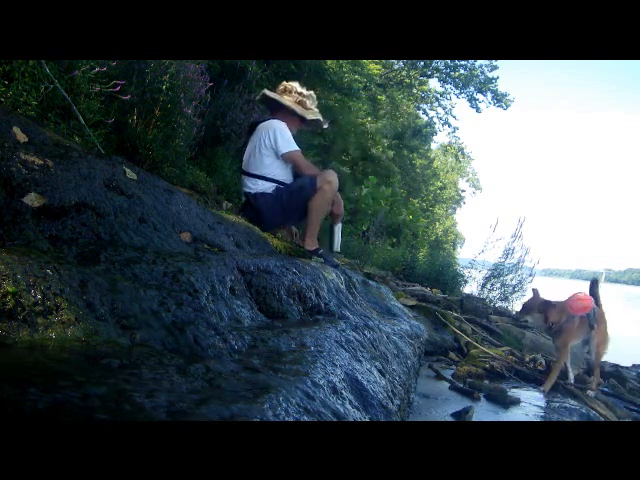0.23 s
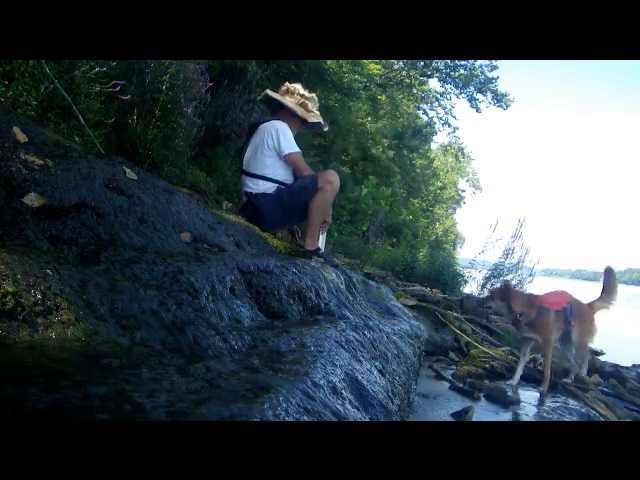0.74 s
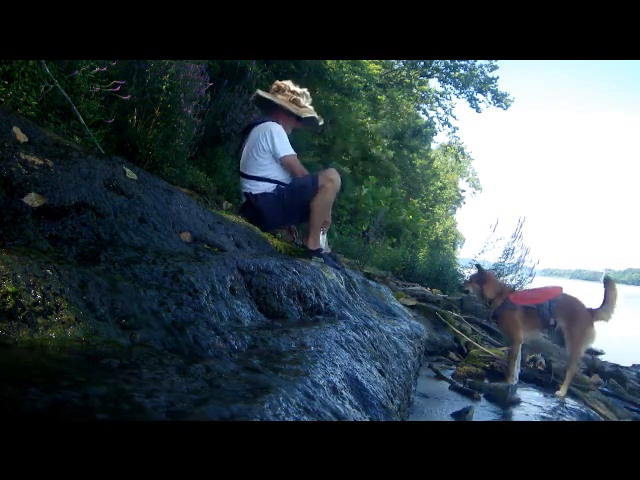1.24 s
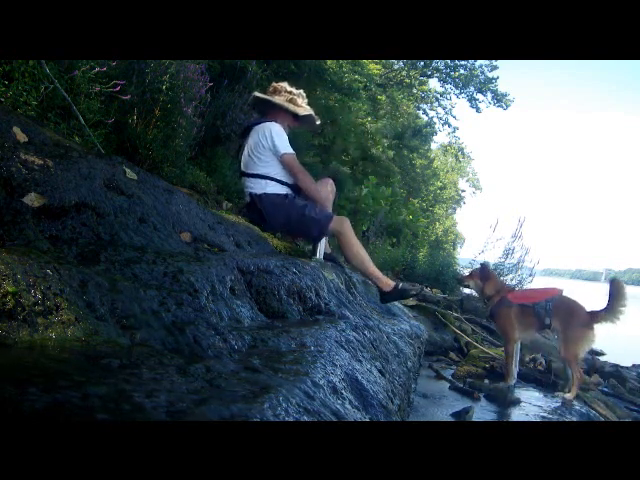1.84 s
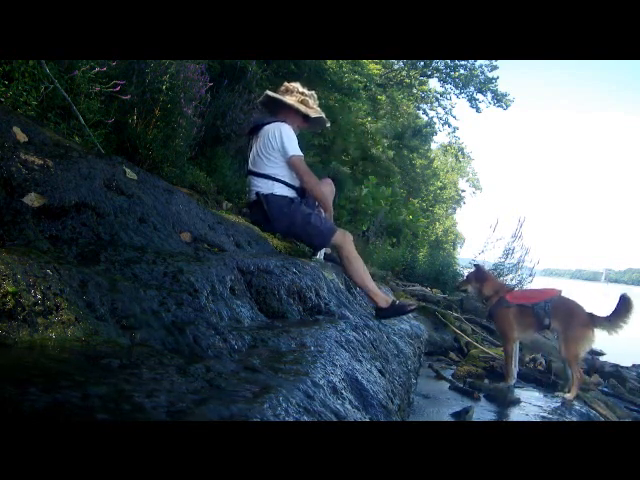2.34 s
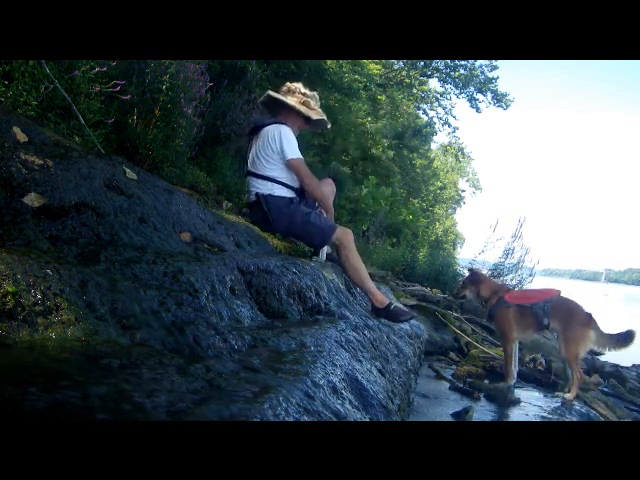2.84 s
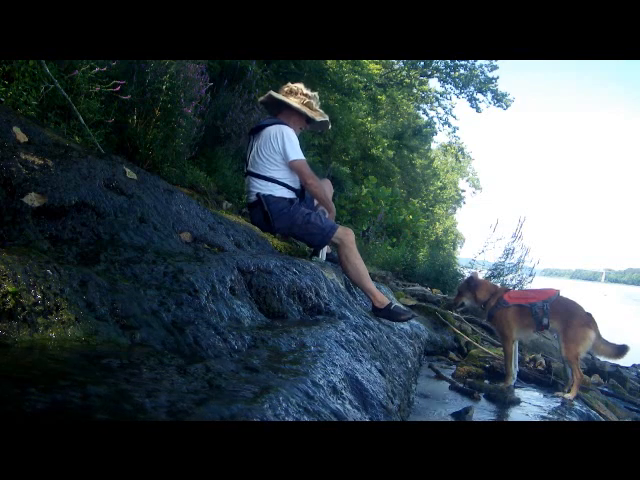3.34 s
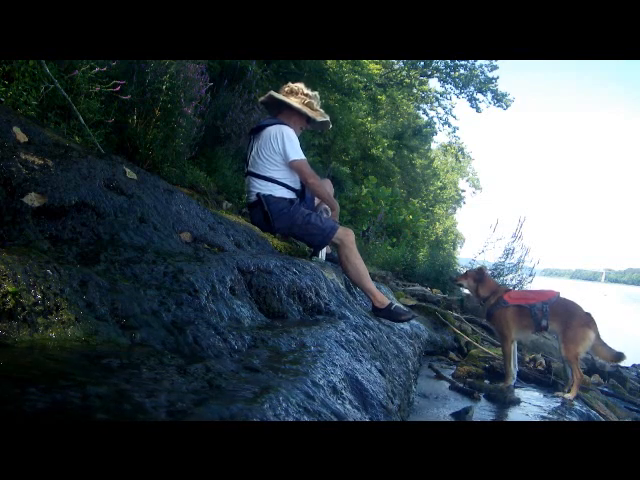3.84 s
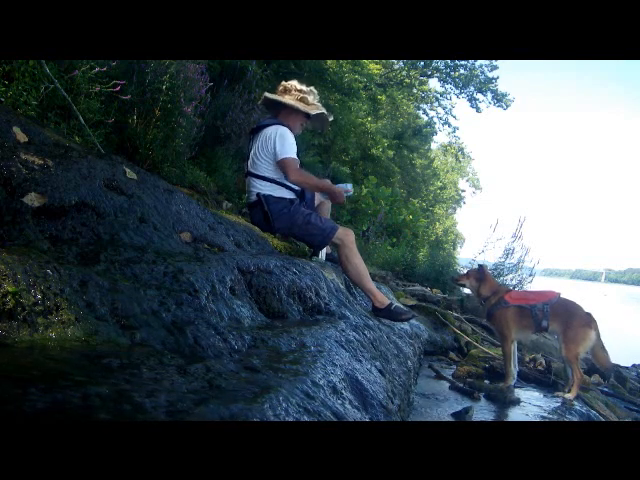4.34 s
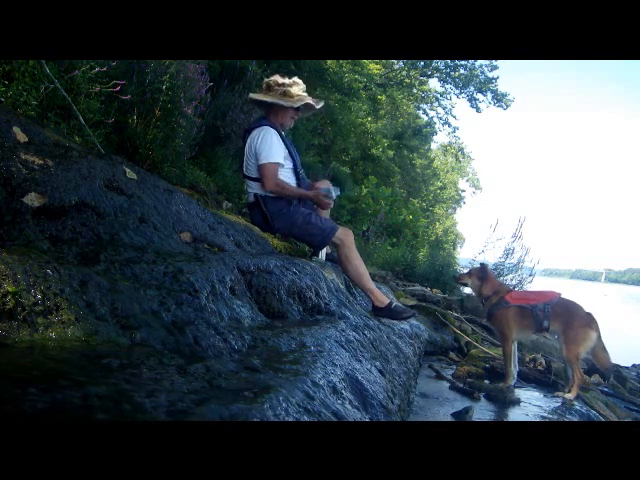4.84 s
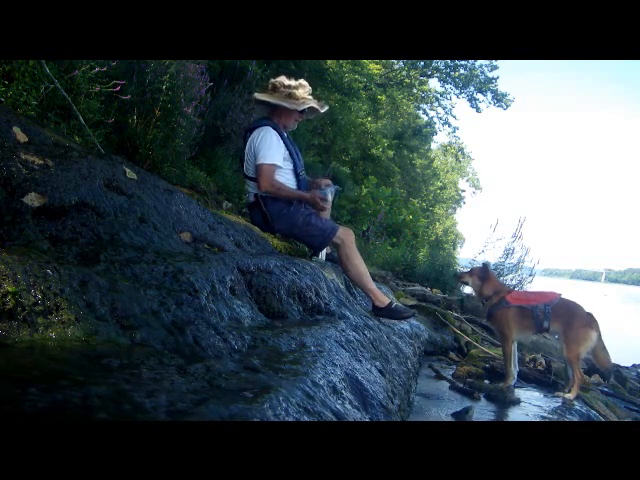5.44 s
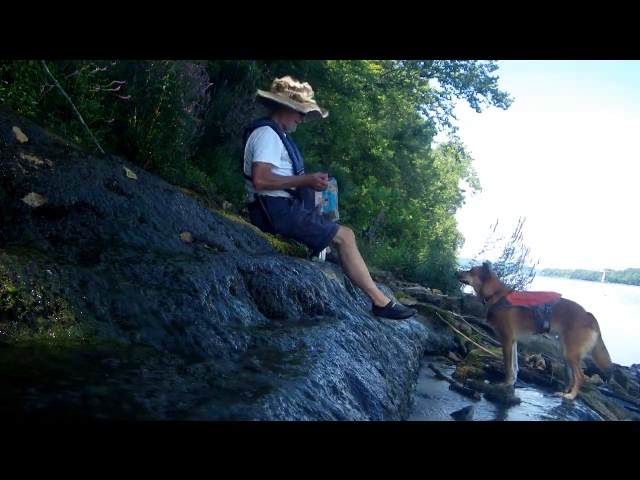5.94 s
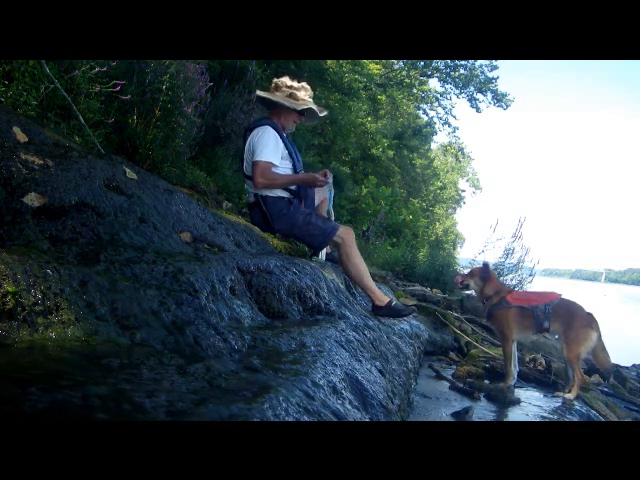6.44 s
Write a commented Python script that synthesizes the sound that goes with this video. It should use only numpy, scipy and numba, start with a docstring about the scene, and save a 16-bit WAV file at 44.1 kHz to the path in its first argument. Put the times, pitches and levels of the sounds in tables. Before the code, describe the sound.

A close, steady trickle splashes onto wet rock outdoors, mixing a hollow bubbling with a bright, fizzy patter. Scattered drips tick and smack over it throughout, along with brief glugs from larger bubbles. Late on, a couple of hard drops slightly overload the small microphone, and the trickle ducks and creeps back. A very faint low wash of river lies underneath.

```python
"""Trickle on a rock ledge

Beside a river, a small camera's microphone sits close to water running steadily down a ledge.
The river is a faint wash behind. The stream traps bubbles that gurgle in a hollow, its spray
patters on wet stone, and single drops smack nearby. The sharpest drops overload the
microphone; the gain control ducks and then creeps back up."""
import sys
import numpy as np
from scipy import signal
from scipy.fft import rfft, irfft, next_fast_len
from scipy.io import wavfile
from scipy.ndimage import uniform_filter1d
from numba import njit

SR = 44100
rng = np.random.default_rng(int(sys.argv[2]) if len(sys.argv) > 2 else 0)


def waveform_to_disk(signal):
    """Save audio, clipped to [-1, 1], as 16-bit WAV at the path in sys.argv[1]."""
    frames = np.transpose(np.atleast_2d(signal))
    scaled = np.clip(frames, -1, 1) * 32767
    samples = np.round(scaled).astype(np.int16)
    wavfile.write(sys.argv[1], SR, samples)


N = 295470

# the biggest bubbles, which stand out of the gurgle: t/s, f/Hz, level/dB
GLUGS = [(0.78, 1535, -12), (0.986, 553, -30.5), (1.178, 1510, -12), (1.474, 1450, -10.5),
         (1.952, 1440, -13.5), (2.103, 568, -31), (2.781, 1680, -16), (3.148, 530, -32),
         (3.354, 528, -28.5), (3.411, 1520, -11.5), (3.427, 1390, -12), (4.084, 1475, -13.5),
         (4.12, 1630, -10), (4.837, 1600, -13.5), (6.28, 503, -27), (6.476, 1404, -8.5), (6.655, 1360, -13)]


def undb(db):
    """Decibels to gain."""
    return 10 ** (np.asarray(db) / 20)


def level(x, db=0):
    """Scale to an rms level."""
    return x * undb(db) / np.sqrt(np.mean(x ** 2))


def colour(x, points):
    """Causal filter through (Hz, dB) points, so that every click rings after its start."""
    size = next_fast_len(N + 8192, real=True)
    hz, db = np.transpose(points)
    freqs = np.arange(size // 2 + 1) * SR / size
    log_gain = np.log(undb(np.interp(np.log(freqs + 1), np.log(hz), db)))
    cepstrum = irfft(log_gain, size)
    cepstrum[1:size // 2] *= 2  # fold onto positive time: minimum phase
    cepstrum[size // 2 + 1:] = 0
    return irfft(rfft(x, size) * np.exp(rfft(cepstrum)), size)[:N]


def walk(per_s):
    """Random steps, smoothed twice into a wander of rms 1."""
    hold = max(int(SR / per_s), 1)
    steps = np.repeat(rng.standard_normal(N // hold + 1), hold)[:N]
    return level(uniform_filter1d(uniform_filter1d(steps, hold), hold))


@njit
def ring(start, hz, cycles, gain, swell, glide):
    """Bubbles: sines that swell over `swell` cycles, fall by 1 / e in `cycles` and rise by `glide`."""
    out = np.zeros(N)
    for k in range(len(start)):
        first = int(start[k] * SR)
        end = min(first + int(6 * cycles[k] * SR / hz[k]), N)
        for i in range(max(first + 1, 0), end):
            age = (i / SR - start[k]) * hz[k]  # in cycles
            phase = 2 * np.pi * age * (1 + glide * age / cycles[k] / 2)
            envelope = (1 - np.exp(-age / swell)) * np.exp(-age / cycles[k])
            out[i] += gain[k] * envelope * np.sin(phase)
    return out


def cloud(count, low_hz, high_hz, cycles, spread_db, glide):
    """Bubbles at random moments, many weak and few strong, with even power per Hz between two pitches."""
    when, pitch, length, strength = rng.random((count, 4)).T
    hz = low_hz * (high_hz / low_hz) ** pitch
    gain = hz * undb(-spread_db * np.log(1 - .995 * strength))
    return level(ring(when * N / SR, hz, cycles * (.5 + length), gain, swell=.11, glide=glide))


def scatter(count, centre_hz, mean_db, spread_octaves=.17, spread_db=3):
    """Rows (s, Hz, dB) of drops at random moments, alike in pitch and strength."""
    when, pitch, strength = rng.random((count, 3)).T
    hz = centre_hz * 2 ** (spread_octaves * (2 * pitch - 1))
    db = mean_db + spread_db * (2 * strength - 1)
    return np.column_stack([when * N / SR, hz, db])


def river():
    """In the background, a faint wash from the open river and dull plops under the ledge."""
    # spectrum of the open water: f/Hz, level/dB
    wash_spectrum = [(20, -6), (70, -9), (140, 6), (280, 3), (500, 3), (1000, -52)]
    wash = colour(rng.standard_normal(N), wash_spectrum)
    plops = cloud(count=100, low_hz=159.5, high_hz=182, cycles=5.8, spread_db=2, glide=.005)
    return level(wash, db=-72) + level(plops, db=-69)


def surges():
    """Quick uneven swells of the stream, with the slow drift taken out; rms 1."""
    swell = walk(per_s=45)
    return level(swell - uniform_filter1d(swell, size=5000))


def spurts(width_s=.016):
    """A brief gush of water around each bright glug, from 0 to 1."""
    t = np.arange(N) / SR
    bright_times = [start for start, hz, db in GLUGS if hz > 1000]
    return np.max([np.exp(-((t - start) / width_s) ** 2) for start in bright_times], axis=0)


def gurgle(flow_db, surge):
    """Bubbles trapped where the stream lands; the hollow favours those near 530 and 1480 Hz."""
    # resonances of the hollow: f/Hz, level/dB
    hollow = [(150, -55), (250, -42.5), (355, -28), (425, -19), (533, -14.5), (644, -17), (816, -25.5),
              (923, -25), (1230, -11), (1360, -3), (1450, 1.5), (1720, -4.5), (2010, -6), (2230, -14.5),
              (2400, -22.5), (3120, -51), (5280, -120)]
    small = cloud(count=9000, low_hz=955, high_hz=2615, cycles=3.5, spread_db=1.43, glide=.027)
    large = cloud(count=2600, low_hz=232, high_hz=944, cycles=2.2, spread_db=.7, glide=.031)
    churn = rng.standard_normal(N)
    water = colour(small + undb(-6) * large + undb(5.5) * churn, hollow)
    flutter_db = .59 * surge + .4 * walk(per_s=25)
    return level(water * undb(flutter_db)) * undb(flow_db)


def spray(flow_db, surge):
    """Droplets patter on the stone over a fine hiss; some plink into the film, the smallest fizz."""
    # spectrum of spray on wet stone: f/Hz, level/dB
    wet_stone = [(1290, -27.5), (2200, -6.5), (2550, -4.5), (3390, -4), (3680, -5.5), (4440, 0),
                 (4780, -1.5), (5230, 0), (5820, -5.5), (6260, -1.5), (8890, -16.5), (9810, -15.5),
                 (14100, -24.5), (15500, -33)]
    patter = cloud(count=18000, low_hz=1922, high_hz=7370, cycles=2.6, spread_db=2, glide=.0047)
    plinks = cloud(count=200, low_hz=3310, high_hz=5670, cycles=23, spread_db=.5, glide=.011)
    fizz = cloud(count=9000, low_hz=6800, high_hz=15800, cycles=5.1, spread_db=3, glide=.005)
    fizz *= undb(2.9 * walk(per_s=45))
    hiss = rng.standard_normal(N)
    water = colour(patter + undb(-10) * plinks + fizz + undb(5.5) * hiss, wet_stone)
    flutter_db = .51 * surge + .82 * walk(per_s=65)
    return level(water * undb(flutter_db)) * undb(flow_db)


def bloop():
    """One quiet bubble chirps upward as it surfaces."""
    return ring(start=np.array([1.297]), hz=np.array([620]), cycles=np.array([11.]),
                gain=undb([-33]), swell=3., glide=.45)


def glugs():
    """Big bubbles swell for a cycle or two and ring for a few more."""
    start, hz, db = np.array(GLUGS, float).T.copy()
    return ring(start, hz, cycles=np.full(len(start), 4.7), gain=undb(db + 6.5), swell=2.2, glide=.0034)


def drops():
    """Close to the microphone, each drop pings for a few cycles and the water film rings after it."""
    # the hardest drops that smack on wet stone: t/s, f/Hz, level/dB
    smacks = [(0.34, 4930, -0.5), (1.261, 4730, -3.5), (2.151, 4000, -2), (2.384, 4470, -2),
              (2.86, 4500, -2), (3.085, 10800, -13), (3.193, 4280, -7), (3.439, 4700, -7),
              (4.121, 4740, -1.5), (4.6, 4350, -3.5), (4.848, 4900, -2.5), (5.234, 9450, -8.5),
              (5.312, 4800, -0.5), (5.338, 4000, -5), (5.519, 4600, 4.5), (5.866, 5100, 5),
              (5.922, 4420, -5)]
    drips = scatter(count=24, centre_hz=4530, mean_db=-11.5)  # lighter drops
    ticks = scatter(count=7, centre_hz=10800, mean_db=-20.5)  # fine droplets
    start, hz, db = np.vstack([smacks, drips, ticks]).T.copy()
    each = np.ones(len(start))
    ping = ring(start, hz, cycles=2.8 * each, gain=undb(db + 4), swell=.9, glide=0.)
    film = ring(start, hz, cycles=14 * each, gain=undb(db - 14.5), swell=1.2, glide=.006)
    # so small a source radiates no bass
    return signal.sosfilt(signal.butter(2, 1800, "high", fs=SR, output="sos"), ping + film)


def scene():
    """At the ledge, gurgle and spray wander, surge and spurt together, over the faint river."""
    wander_db = .62 * walk(per_s=2.7)
    surge, spurt = surges(), spurts()
    bubbling = gurgle(flow_db=-24 + wander_db + 3 * spurt, surge=surge)
    splashing = spray(flow_db=-23.5 + wander_db + 1.4 * spurt, surge=surge)
    return (bubbling + splashing + drops() + glugs() + bloop() + river())[None]


@njit
def gain_control(x, ceiling, attack, release_db_per_s):
    """The camera's gain cut in dB: peaks over the ceiling deepen it at once, then it eases off."""
    out, cut_db = np.empty(len(x)), 0.
    for i in range(len(x)):
        over_db = 20 * np.log10(abs(x[i]) / ceiling + 1e-9) - cut_db
        cut_db = max(cut_db + attack * max(over_db, 0.) - release_db_per_s / SR, 0.)
        out[i] = cut_db
    return out


def record(dry):
    """The camera's mono microphone: uneven response, gain control, rounded overload, low and top cuts."""
    # narrow peaks and dips in the microphone's response: f/Hz, width/Hz, level/dB
    mic_ripple = [(2570, 90, -1.5), (4490, 110, 1), (4740, 80, -3), (6225, 70, 1.5), (6660, 140, -5.5),
                  (7380, 130, -4)]
    freqs = np.arange(N // 2 + 1) * SR / N
    ripple_db = sum(db * np.exp(-((freqs - hz) / width) ** 2) for hz, width, db in mic_ripple)
    heard = irfft(rfft(dry[0]) * undb(ripple_db), N)
    cut_db = gain_control(heard, ceiling=float(undb(-7)), attack=.39, release_db_per_s=14)
    # the gain slides down within a millisecond, so the first cycles of a loud drop still overload
    ducked = heard * undb(-uniform_filter1d(cut_db, size=40))
    clipped = ducked / (1 + (ducked / .53) ** 8) ** (1 / 8)
    low_cut = signal.butter(1, 60, "high", fs=SR, output="sos")
    top_cut = signal.ellip(8, .2, 70, 15400, fs=SR, output="sos")
    return signal.sosfilt(top_cut, signal.sosfilt(low_cut, clipped))[None]


dry = scene()
out = record(dry)
waveform_to_disk(out)
```